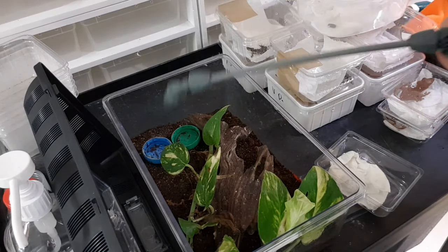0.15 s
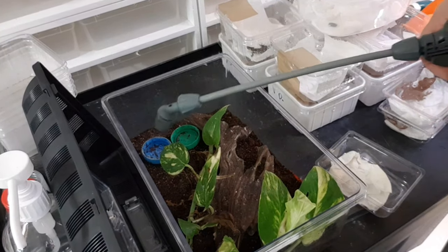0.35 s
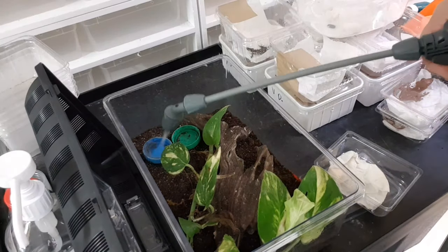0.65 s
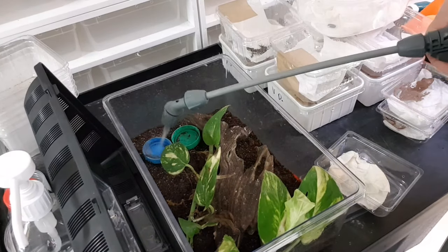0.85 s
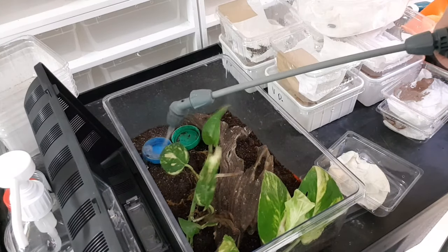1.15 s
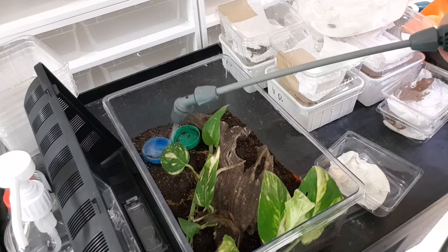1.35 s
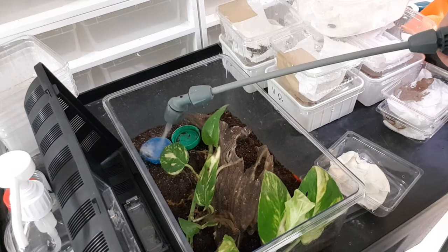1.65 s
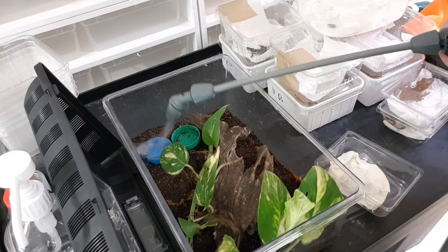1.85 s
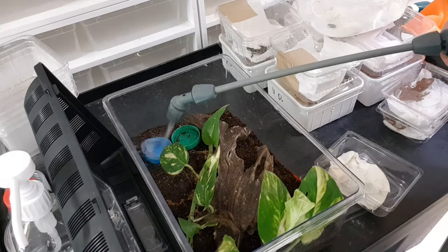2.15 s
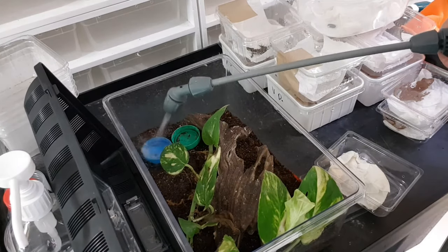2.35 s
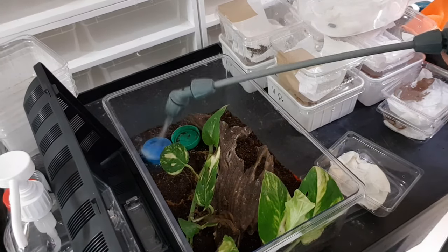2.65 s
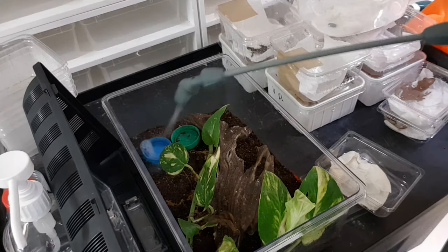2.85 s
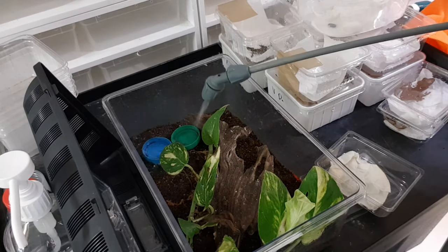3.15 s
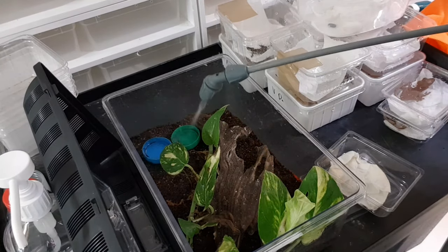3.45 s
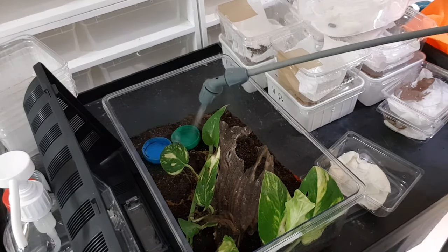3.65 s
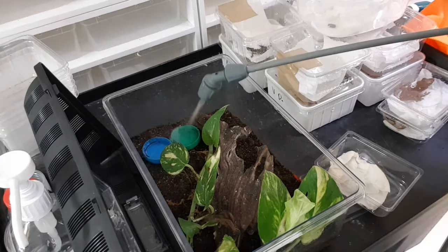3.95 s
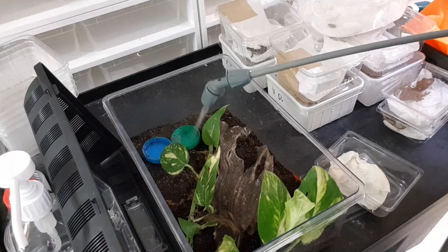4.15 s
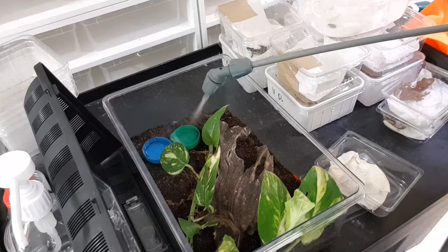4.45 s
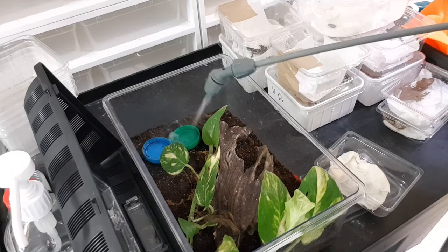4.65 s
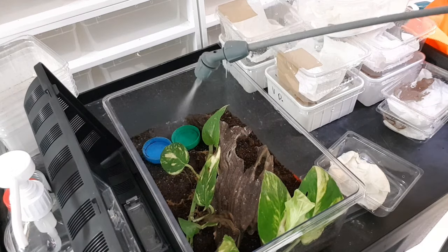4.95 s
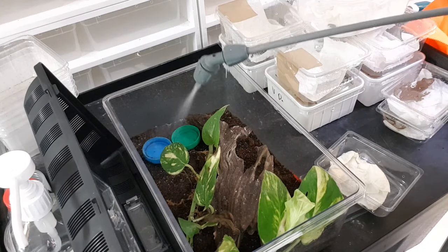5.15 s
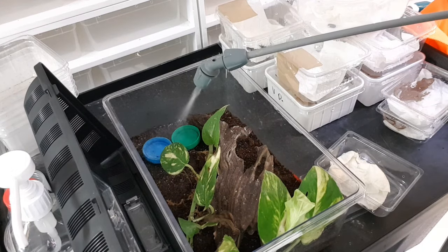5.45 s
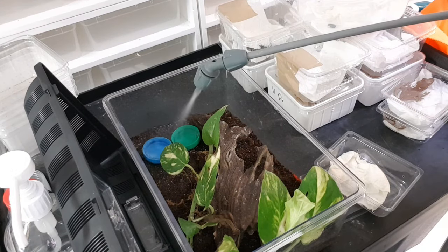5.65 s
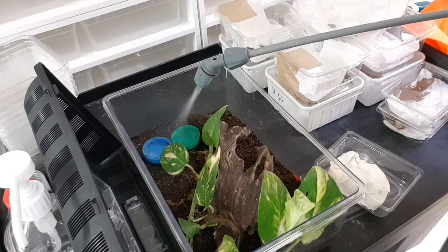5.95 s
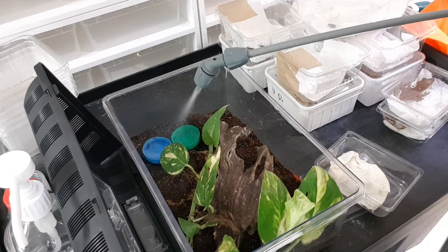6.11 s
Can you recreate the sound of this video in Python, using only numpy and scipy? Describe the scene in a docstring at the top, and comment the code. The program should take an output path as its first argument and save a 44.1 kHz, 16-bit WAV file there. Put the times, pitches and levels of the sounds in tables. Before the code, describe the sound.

In a quiet indoor room, a faint rustle precedes a soft bump as a sprayer valve opens. Fine bright spray hisses onto a small plastic dish with a wavering, hollow ring, moves to a second, higher-ringing dish, then patters dully on soil. Occasional sharp ticks of larger drops. Close stereo microphone, spray clearly stronger on the right, with short tub reflections.

```python
"""Countless droplets hiss on a blue water dish, then a green one, each ringing at its own drifting pitch.
A pressure sprayer mists a planted plastic tub indoors, to the right of the microphone.
At last the spray patters softly on soil and wall; the nozzle spits a larger drop now and then.
Random impacts, bubble pings and shaped noise make the spray; a resonator that follows a pitch makes each dish.
Tub modes, noise-tail echoes and a shaded left port follow."""
import sys
import numpy as np
from scipy import signal
from scipy.fft import rfft, irfft, next_fast_len
from scipy.io import wavfile
from scipy.ndimage import map_coordinates

SR = 44100
rng = np.random.default_rng(int(sys.argv[2]) if len(sys.argv) > 2 else 0)


def to_wav(s):
    """Save 16-bit WAV."""
    ch = np.atleast_2d(s).T  # columns
    pcm = np.round(np.clip(ch, -1, 1) * 32767)  # PCM
    wavfile.write(sys.argv[1], SR, pcm.astype(np.int16))


N = 276948

# Table levels are relative: spectra are normalised, layers are trimmed in the mix.
# valve opens over the blue dish; jet moves to the green dish, then to the soil
OPEN_S, TO_GREEN_S, TO_SOIL_S = 0.4677, 2.93, 4.91


def amp(db):
    """Decibels to gain."""
    return 10 ** (np.asarray(db) / 20)


def unit(x):
    """Scale to rms 1."""
    return x / np.sqrt(np.mean(x ** 2) + 1e-20)


def along(points, hz):
    """Read (frequency [Hz], value) points on a log-frequency axis."""
    f, v = np.transpose(points)
    return np.interp(np.log(hz + 1), np.log(f), v)


def curves(rows):
    """One value per sample for each column after the time."""
    s, *cols = np.transpose(rows)
    return [np.interp(np.arange(N) / SR, s, c) for c in cols]


def step(at_s, fade_s):
    """Smooth switch from 0 to 1."""
    return 0.5 + 0.5 * np.tanh((np.arange(N) / SR - at_s) / fade_s)


def swell(at_s, length_s):
    """Gaussian bump in time."""
    return np.exp(-((np.arange(N) / SR - at_s) / length_s) ** 2)


def wobble(rate_hz):
    """Smooth random curve through rate_hz knots a second."""
    knots = rng.standard_normal(int(N * rate_hz / SR) + 4)
    return map_coordinates(knots, [np.arange(N) * rate_hz / SR])


def filtered(x, response):
    """Multiply the spectrum of x by a complex response of frequency."""
    m = next_fast_len(N + SR // 2)
    return irfft(rfft(x, m) * response(np.fft.rfftfreq(m, 1 / SR)), m)[..., :N]


def coloured(x, spectrum):
    """Filter x by a spectrum table and scale to rms 1."""
    return unit(filtered(x, lambda hz: amp(along(spectrum, hz))))


def resonance(hz, centre_hz, width_hz):
    """Complex response of one mode, 1 at its centre."""
    damping = 1j * hz * width_hz
    return damping / (centre_hz ** 2 - hz ** 2 + damping)


def droplets(rate_hz, spread_db, wash_db, clump_db, apart):
    """Random impacts over a wash of tiny ones, in clumps; apart = how unlike they reach the two ports."""
    lands = rng.random(N) < rate_hz / SR
    size = amp(spread_db * np.clip(rng.standard_normal(N), -3, 2.6))
    # each drop lands at its own spot, so it has its own strength at each port
    paths = rng.choice([-1, 1], N) + apart * rng.uniform(-0.9, 1, (2, N))
    impacts = unit(lands * size * paths)
    noise = rng.standard_normal(N) + apart * rng.standard_normal((2, N))
    wash = amp(wash_db) * unit(noise)
    clumps = amp(clump_db * unit(wobble(45) + wobble(260)))
    return unit((impacts + wash) * clumps)


def bubbles(rate_hz, pitch_hz, scatter, cycles, spread_db, size=100):
    """Tiny bubbles burst in the wet film, each a decaying ping of a few cycles at its own pitch."""
    count = int(rate_hz * N / SR)
    when, tune, loud, lag = rng.random((count, 4)).T[:, :, None]
    hz = np.minimum(pitch_hz * np.exp(scatter * (2 * tune - 1)), SR / 2)
    t = np.arange(size) / SR
    level = amp(spread_db * np.minimum(-np.log(1 - loud), 5))
    envelope = level * np.exp(-hz * t / cycles)
    at = ((when * (N - size)).astype(int) + np.arange(size)).ravel()
    ports = []
    for side in (-1, 1):
        phase = 2 * np.pi * hz * t + side * (2 * lag - 1)
        ports.append(np.bincount(at, (envelope * np.sin(phase)).ravel(), N))
    return unit(np.array(ports))


# room and hiss spectra: (frequency [Hz], level [dB])
ROOM_SPECTRUM = [(15, -24), (25, -15), (64, -9.5), (87, -4), (143, -2.5), (190, -14.5), (246, -7.5),
                 (319, -21.5), (413, -13), (694, -33), (1140, -24), (2790, -41.5), (7000, -36.5),
                 (9100, -73), (15400, -120)]
HISS_SPECTRUM = [(3000, -20), (8000, -26), (9500, -16), (12000, -11), (15300, -9.5)]


def background():
    """Low room noise, nearly alike at both ports, and a faint hiss mostly on the left."""
    room = coloured(rng.standard_normal(N) + 0.5 * rng.standard_normal((2, N)), ROOM_SPECTRUM)
    hiss = coloured(rng.standard_normal((2, N)), HISS_SPECTRUM)
    return amp([[-69], [-62]]) * room + amp([[-62], [-73]]) * hiss  # left, right


# rustle, bump and jet spectra: (frequency [Hz], level [dB])
RUSTLE_SPECTRUM = [(500, -19), (1100, -3), (1600, -5), (2200, -10), (3200, -15.5)]
BUMP_SPECTRUM = [(20, -4), (35, -5), (90, -1), (160, -8.5), (400, -58)]
JET_SPECTRUM = [(6000, -28), (7300, -19), (7750, 6), (8300, -8), (10000, -35)]


def wand():
    """Shaped noise: rustle as the wand is lowered; soft bump and thin jet hiss as the valve opens."""
    rustle = amp(-72.5) * swell(0.22, 0.25) * coloured(rng.standard_normal(N), RUSTLE_SPECTRUM)
    bump = amp(-59) * swell(0.62, 0.094) * coloured(rng.standard_normal(N), BUMP_SPECTRUM)
    jet_gate = step(0.46, 0.008) * swell(0.6, 0.36)
    jet = amp(-54.5) * jet_gate * coloured(rng.standard_normal(N), JET_SPECTRUM)
    return rustle + bump + jet


# soil patter and tub-floor spectra: (frequency [Hz], level [dB])
SOIL_SPECTRUM = [(200, -25), (330, -6.5), (450, -3.5), (530, -8.5), (620, -1), (760, -2), (900, -2.5),
                 (1100, -3), (1450, -2.5), (2000, -17.5), (3500, -51)]
FLOOR_SPECTRUM = [(30, -12.5), (80, -5), (125, -3.5), (160, 1.5), (200, -2.5), (275, -1.5), (325, -10.5),
                  (450, -19), (520, -15.5), (620, -11), (780, -60), (1200, -50)]
# stray drops throughout, gap between the dishes, full jet on soil, even floor drumming
STRAY_DB, GAP_DB, SOIL_DB, DRUM_DB = -70, -60, -62, -62
# gap crossing time; fresh soil is louder until soaked
CROSS_S, FRESH_DB, SOAK_S = 0.072, 10, 0.29


def patter():
    """Soft, dull impacts where the jet misses the dishes, and the tub floor drumming below."""
    soft = droplets(rate_hz=1100, spread_db=2.5, wash_db=0, clump_db=0.4, apart=0.62)
    heavy = droplets(rate_hz=900, spread_db=2.0, wash_db=2.5, clump_db=2.0, apart=0.38)
    on_soil_s = np.maximum(np.arange(N) / SR - TO_SOIL_S, 0)
    fresh = np.exp(-on_soil_s / SOAK_S)
    stray = amp(STRAY_DB + 2.7 * wobble(5.01))
    gap = amp(GAP_DB) * swell(TO_GREEN_S + 0.042, CROSS_S)
    soil = amp(SOIL_DB + FRESH_DB * fresh) * step(TO_SOIL_S + 0.047, 0.063)
    drumming = amp(DRUM_DB) * coloured(heavy, FLOOR_SPECTRUM)
    return (stray + gap + soil) * coloured(soft, SOIL_SPECTRUM) + drumming


# larger drops: (time [s], level [dB])
SPIT_DROPS = [(2.4165, -27), (2.5032, -23), (2.9695, -26), (3.136, -33), (3.7505, -22.5), (3.9005, -24),
              (4.1366, -28), (4.794, -23), (5.3314, -32), (5.5115, -24), (5.7165, -24), (5.785, -30),
              (6.1191, -28)]


def spits(life_s=0.00057):
    """A larger drop lands with a short, bright tick: decaying sine plus differenced noise."""
    out, t = np.zeros(N), np.arange(SR // 100) / SR
    for s, db in SPIT_DROPS:
        pitch_hz = 12000 * np.exp(0.05 * rng.standard_normal())
        crack = 0.26 * np.diff(rng.standard_normal(len(t) + 1))
        tick = (np.sin(2 * np.pi * pitch_hz * t) + crack) * np.exp(-t / life_s)
        out[round(s * SR):][:len(t)] += amp(db) * tick
    return out


# a harder hit rings higher; a dish starts sharp until water gathers in it
USUAL_RING_DB, RISE_HZ_PER_DB, DRY_SHARP_HZ = -50, 24, 370
DRY_DB = 0.5  # rings a little louder until then


def dish(rows, wet_hz, fill_s, width_hz, skirt_hz):
    """Drops drive a moving resonator; pitch sinks as water gathers and rises with a squarer hit."""
    ring_db, = curves(rows)
    wetted_s = np.maximum(np.arange(N) / SR - rows[0][0], 0)
    dryness = np.exp(-wetted_s / fill_s)
    pitch_hz = wet_hz + DRY_SHARP_HZ * dryness + RISE_HZ_PER_DB * (ring_db - USUAL_RING_DB)
    # shift the pitch to 0 Hz, low-pass twice, shift back
    turn = np.exp(2j * np.pi * np.cumsum(pitch_hz) / SR)
    ring = droplets(rate_hz=1200, spread_db=3.5, wash_db=1.0, clump_db=0.9, apart=0.77) / turn
    for width in (width_hz, skirt_hz):
        keep = np.exp(-np.pi * width / SR)
        ring = signal.lfilter([1 - keep], [1, -keep], ring)
    # so small a dish radiates little below its ring
    radiated = coloured((ring * turn).real, [(700, -27.0), (1300, -8)])
    return amp(ring_db + DRY_DB * dryness) * radiated


# how squarely the jet hits each dish: (time [s], level [dB])
BLUE_HITS = [(0.48, -50), (0.6, -43), (0.72, -53), (0.83, -47.5), (1.06, -58), (1.15, -48), (1.42, -66.5),
             (1.55, -52), (2.03, -53), (2.1, -46.5), (2.28, -52), (2.3, -48), (2.59, -59), (2.88, -48.5),
             (2.92, -57)]
GREEN_HITS = [(2.95, -56), (3.2, -44.5), (3.3, -56.5), (3.35, -45.5), (3.53, -47), (4.19, -45.5),
              (4.2, -52), (4.3, -52), (4.34, -43), (4.59, -58.5), (4.84, -48), (4.95, -60)]
# green dish hum spectrum: (frequency [Hz], level [dB])
HUM_SPECTRUM = [(130, -20), (185, -11), (212, 5), (245, -5), (340, -41)]


def dishes():
    """The blue dish rings broadly; the green one adds a narrow, steady mode and a low hum."""
    past_blue, past_green = step(TO_GREEN_S, 0.015), step(TO_SOIL_S, 0.03)
    blue = dish(BLUE_HITS, wet_hz=1620, fill_s=0.52, width_hz=440, skirt_hz=746)
    green = dish(GREEN_HITS, wet_hz=2102, fill_s=0.26, width_hz=320, skirt_hz=870)
    green = filtered(green, lambda hz: 1 + amp(5.5) * resonance(hz, centre_hz=2151, width_hz=35))
    hum_db = curves(GREEN_HITS)[0] - 16.0
    hum = amp(hum_db) * coloured(rng.standard_normal(N), HUM_SPECTRUM)
    # the hand trembles, so the spray hits the dishes unevenly
    tremble = amp(0.8 * wobble(30))
    blue_part = (1 - past_blue) * amp(-2.0) * tremble * blue
    green_part = (past_blue - past_green) * (amp(-3.5) * tremble * green + hum)
    return blue_part + green_part


# spray, also played by mist(): (time [s], fine mist level [dB], splash level [dB])
SPRAY_LEVELS = [(0.5, -49, -54), (0.59, -50, -50), (0.84, -51.5, -49), (1.14, -46.5, -48.5),
                (1.4, -48, -52), (1.61, -44, -47.5), (2.01, -47.5, -50.5), (2.44, -45, -47.5),
                (2.84, -45.5, -48.5), (2.94, -53, -59), (2.97, -44, -58), (3.15, -49.5, -52),
                (3.59, -46, -49), (4.94, -45, -49), (5.01, -46, -52), (6.27, -46.5, -50.5)]
# splash spectra by surface: (frequency [Hz], level [dB])
BLUE_SPECTRUM = [(900, -21.5), (1500, -24), (2400, -9.5), (2650, -6), (2950, -5), (3850, -4.5), (4400, 2),
                 (5300, 0), (6400, -3), (7500, -13.5), (10000, -18.5)]
GREEN_SPECTRUM = [(900, -20), (1500, -9), (2500, -3.5), (2900, -3.5), (3750, 0), (4300, -1.5), (5000, -2.5),
                  (5500, -6), (6500, -6), (9000, -26)]
SOIL_SPLASH_SPECTRUM = [(900, -15.5), (1500, -13.5), (2100, -9.5), (3050, -2.5), (3550, -6), (4400, -0.5),
                        (5500, 0.5), (6400, -1), (7500, -6), (10000, -25)]
# blue dish rim spectrum: (frequency [Hz], level [dB])
RIM_SPECTRUM = [(1500, -24), (2300, -6), (2800, 9), (3300, -17), (4200, -36)]


def splash():
    """Impacts take their colour from the surface that the wand points at."""
    _, splash_db = curves(SPRAY_LEVELS)
    drops = droplets(rate_hz=2200, spread_db=3.5, wash_db=3, clump_db=1.52, apart=1.53)
    past_blue, past_green = step(TO_GREEN_S, 0.03), step(TO_SOIL_S, 0.05)
    blue = (1 - past_blue) * coloured(drops, BLUE_SPECTRUM)
    green = (past_blue - past_green) * coloured(drops, GREEN_SPECTRUM)
    soil = past_green * coloured(drops, SOIL_SPLASH_SPECTRUM)
    # the spray grazes the rim as it swings back into the blue dish
    rim = amp(-51.5) * swell(1.494, 0.029) * coloured(drops, RIM_SPECTRUM)
    return amp(splash_db + 0.58) * (blue + green + soil) + rim


# mist spectrum: (frequency [Hz], level [dB])
MIST_SPECTRUM = [(3500, -46), (6000, -7.5), (7000, -6.5), (7900, -1.5), (9200, -4.5), (10600, -4),
                 (12000, -1.5), (13500, -3), (15500, -5)]


def mist():
    """The finest droplets sizzle in the treble and leave a fizz of bubbles."""
    mist_db, _ = curves(SPRAY_LEVELS)
    drops = droplets(rate_hz=2000, spread_db=7.0, wash_db=2, clump_db=1.42, apart=1.5)
    fizz = bubbles(rate_hz=1500, pitch_hz=12660, scatter=0.26, cycles=5.3, spread_db=3.5)
    return amp(mist_db + 1.92) * coloured(drops + amp(-6.5) * fizz, MIST_SPECTRUM)


# air resonances of the tub: (centre [Hz], width [Hz], level [dB])
TUB_MODES = [(224, 20, -12.5), (641, 82, -2.5), (1397, 43, -12), (1640, 36, -7), (1840, 67, -5),
             (2397, 40, -1), (5060, 70, -14), (7460, 210, -13)]


def tub(x):
    """The air in the tub adds narrow resonances to the direct sound."""
    def response(hz):
        return 1 + sum(amp(db) * resonance(hz, centre, width) for centre, width, db in TUB_MODES)
    return filtered(x, response)


# reflected share: (frequency [Hz], level [dB])
WET_SPECTRUM = [(200, -8), (2000, -5), (13000, -3)]


def reflections(x, t60_s, size=8192):
    """Short noise-tail echoes, different at each port and ever changing as the spray wanders."""
    t = np.arange(size) / SR
    decay = amp(-60 * t / t60_s)
    window = np.sin(np.pi * np.arange(size) / size)
    padded = np.pad(x, ((0, 0), (size, 2 * size)))
    out = np.zeros((2, N + 4 * size))
    for start in range(0, N + size, size // 2):
        tail = rng.standard_normal((2, size)) * decay / np.linalg.norm(decay)
        echo = signal.fftconvolve(window * padded[:, start:start + size], tail, axes=1)
        out[:, start:start + echo.shape[1]] += echo
    return filtered(out[:, size:size + N], lambda hz: amp(along(WET_SPECTRUM, hz)))


# left port shading: (frequency [Hz], left minus right level [dB])
LEFT_SHADE = [(100, -7.5), (850, -10), (1250, -16.5), (1900, -9.5), (2500, -11), (3200, -5), (4500, -8.5),
              (5800, -9.5), (7000, -18), (7900, -25), (9500, -12), (12000, -11.5), (15500, -8)]


def scene():
    """The spray in the tub, the room's answer, and the two ports that hear them."""
    valve = step(OPEN_S, 0.011)
    spray = tub(valve * (mist() + splash() + dishes() + patter()) + spits() + wand())
    left, right = spray + reflections(spray, t60_s=0.1)
    # the left port faces away: it hears the spray weaker and 30 us later
    left = filtered(left, lambda hz: amp(along(LEFT_SHADE, hz)) * np.exp(-2j * np.pi * hz * 3e-5))
    return amp(4) * np.array([left, right]) + background()


TOP_HZ = 15600


def record(dry):
    """Band limit: nothing is kept from TOP_HZ up."""
    return filtered(dry, lambda hz: hz < TOP_HZ)


dry = scene()
out = record(dry)
to_wav(out)
```